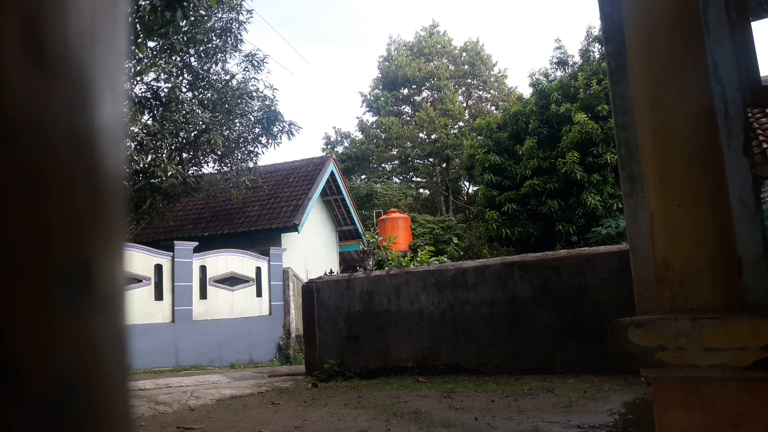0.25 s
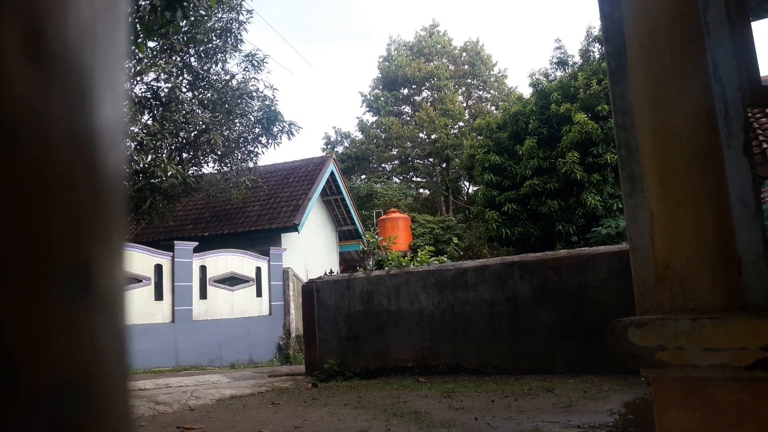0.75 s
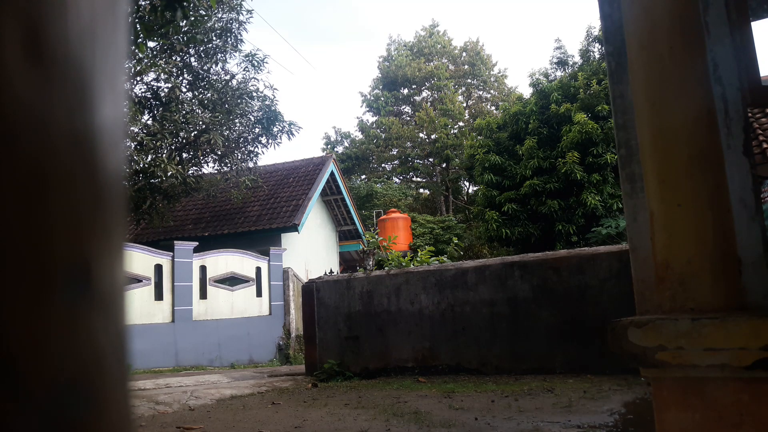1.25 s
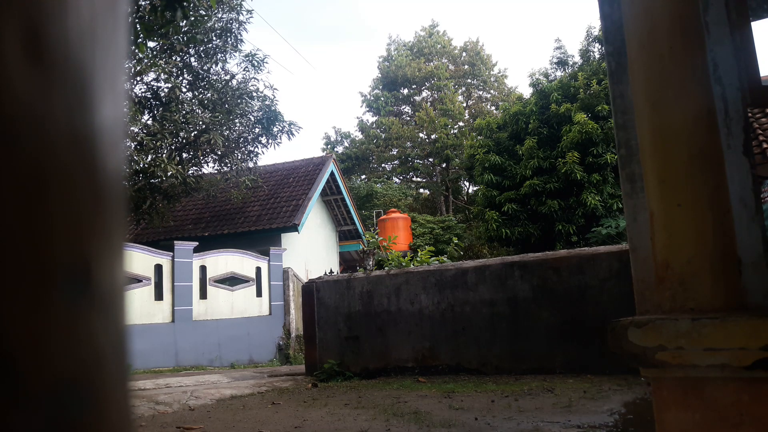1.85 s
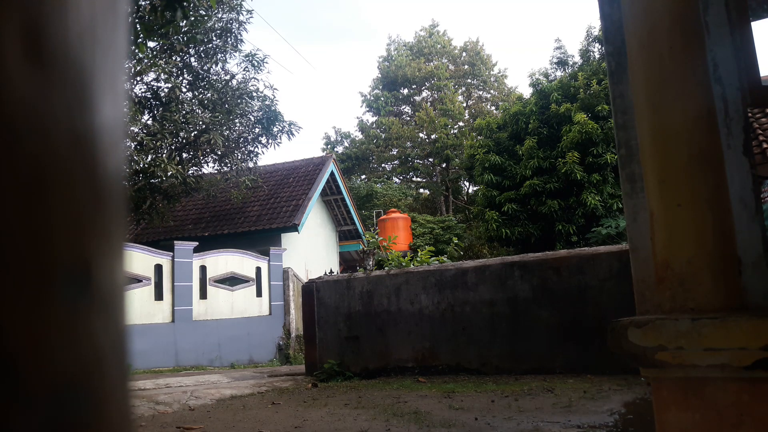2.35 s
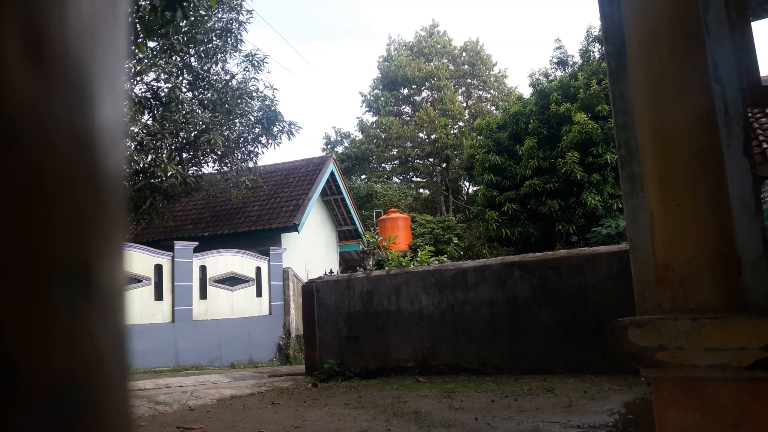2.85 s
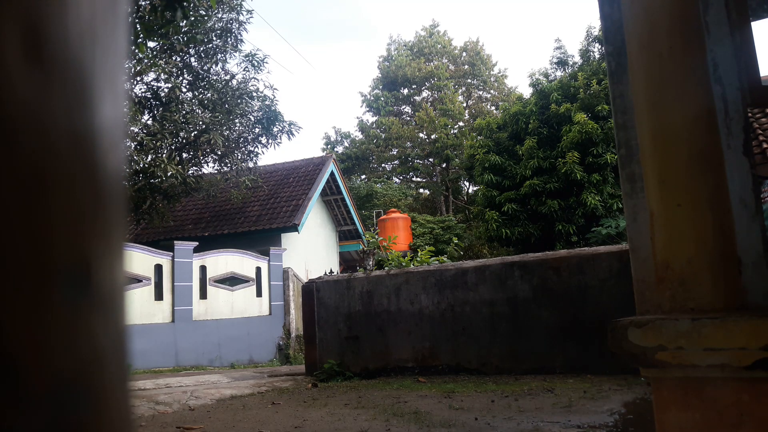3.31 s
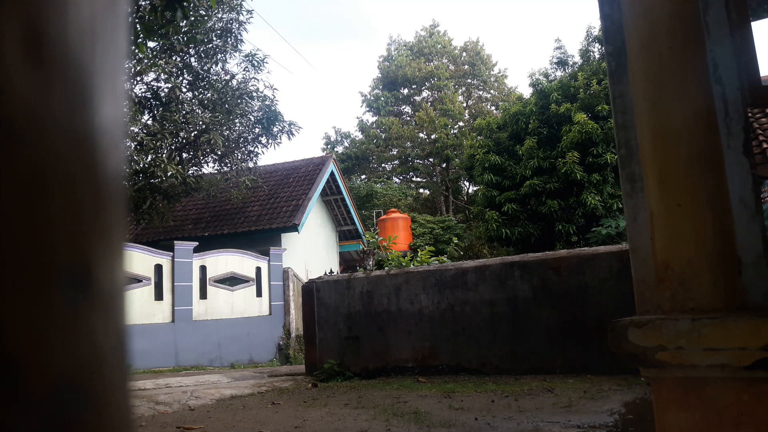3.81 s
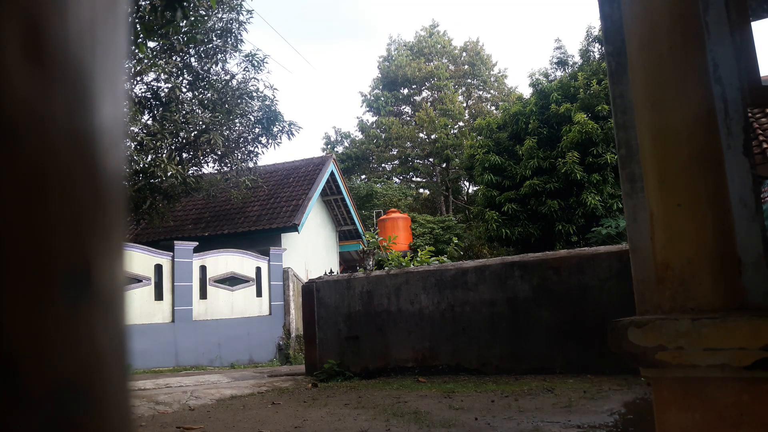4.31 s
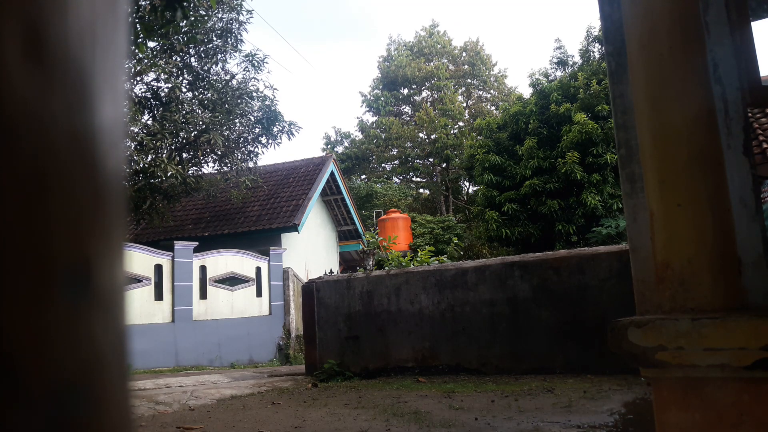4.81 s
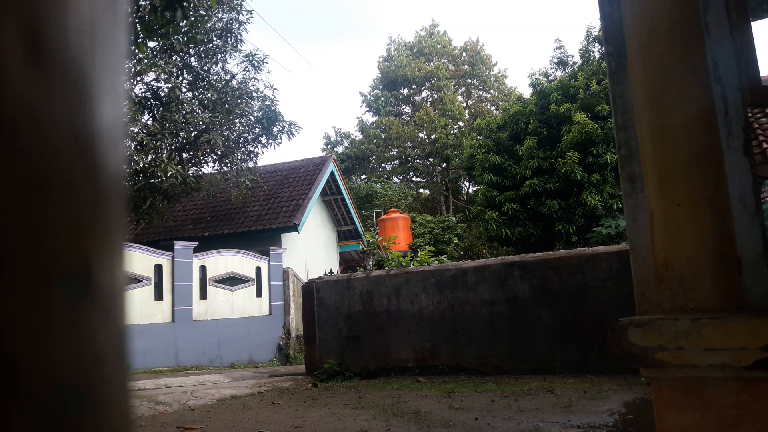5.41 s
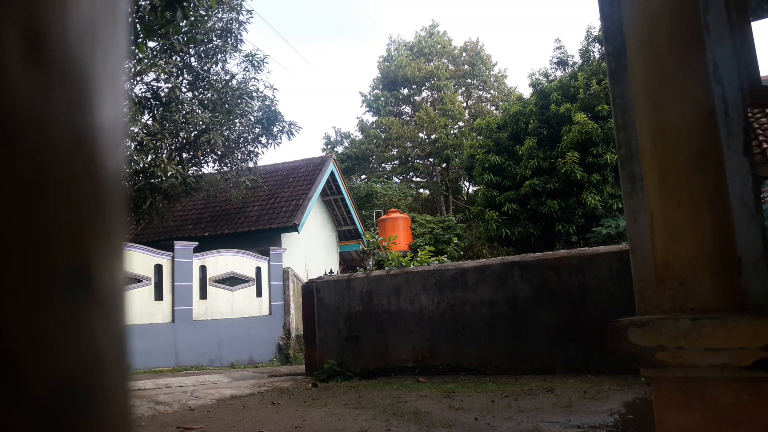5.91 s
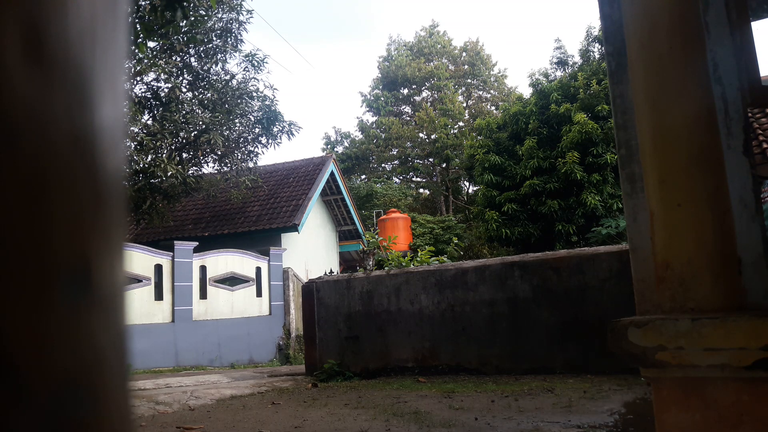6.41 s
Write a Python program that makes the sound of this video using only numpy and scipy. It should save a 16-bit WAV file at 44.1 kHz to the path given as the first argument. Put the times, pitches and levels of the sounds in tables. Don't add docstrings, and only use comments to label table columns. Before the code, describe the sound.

A sudden full-strength thunder clap opens, dips to a rumble, then cracks again and rolls on. After a short lull a crisp double crack lands at two seconds, followed by ever weaker, darker thuds with gaps between. The sound is midrange-heavy and slightly humming under a porch roof, with short echoes between walls. Faint leaf stirring, tiny dry rattles and soft high hiss lie underneath.

```python
import sys
import numpy as np
from scipy import signal
from scipy.fft import rfft, irfft
from scipy.io import wavfile
from scipy.ndimage import uniform_filter1d, minimum_filter1d

SR = 44100
rng = np.random.default_rng(int(sys.argv[2]) if len(sys.argv) > 2 else 0)


def inscribe(sig):
    pcm = np.round(np.clip(np.atleast_2d(sig).T, -1, 1) * 32767)
    wavfile.write(sys.argv[1], SR, pcm.astype(np.int16))


def gain_from_db(level_db):
    decades = np.asarray(level_db, float) / 20
    return 10 ** decades


N = 293573

# t/s, peak
# level/dB, ring f/Hz, front sharpness/dB, front and bright echoes re peak/dB
FRONTS = [(-0.0013, -22, 300, -60, 20), (0.004, 1, 215, -55, -22), (0.727, -4, 240, -28, -9.5),
          (1.003, -10.5, 269, -30, -12), (1.038, -4, 261, -36, -15), (1.101, -17, 331, -27.5, -6),
          (1.95, -3.5, 440, -28, -3.5), (1.985, -10, 382, -44.5, -15), (2.155, -21, 269, -31, 2),
          (2.343, -13, 479, -35, -8), (2.465, -10, 160, -30, -8), (3.074, -17, 310, -34, -4.5),
          (3.159, -11, 190, -27, -7), (3.279, -17, 237, -36, 1.5), (4.141, -17.5, 412, -36.5, -8),
          (4.279, -19, 595, -45, -6), (4.331, -19, 571, -41, -8), (4.44, -18, 328, -35, -11),
          (4.764, -13, 410, -55, -15), (4.941, -22, 253, -39, -6), (5.177, -16.5, 253, -35, -14),
          (5.231, -18, 200, -44, -4), (5.664, -15, 170, -50, -11), (6.6553, -40, 600, -60, 22)]


def evened(x):
    return x / np.sqrt(np.mean(x ** 2) + 1e-20)


def steadied(x, s, share):
    width = round(s * SR)
    power = uniform_filter1d(uniform_filter1d(x ** 2, width), width)
    return evened(x / (power + 1e-9) ** (share / 2))


def colour(x, points):
    hz = abs(np.fft.fftfreq(16384, 1 / SR))
    f, db = np.transpose(points)
    gain_db = np.interp(np.log(hz + 1), np.log(f + 1), db)
    log_gain = np.log(gain_from_db(np.maximum(gain_db, -100)))
    taps = np.fft.ifft(np.exp(np.conj(signal.hilbert(log_gain)))).real
    taps = max(taps, taps[::-1], key=lambda h: np.sum(h[:2000] ** 2))[:8192]
    taps = taps * np.hanning(2 * len(taps))[len(taps):]
    return signal.oaconvolve(x, taps)[:len(x)]


def below(hz, edge_hz, octaves=0.18):
    return 1 / (1 + ((hz + 1) / edge_hz) ** (4 / octaves))


def add(mix, s, sound):
    sound = sound[max(-round(s * SR), 0):]
    part = mix[max(round(s * SR), 0):][:len(sound)]
    part += sound[:len(part)]


def swells(peak_db, start, hold, rise, fall):
    t = np.arange(0, N + 64, 64) / SR
    early = np.maximum(start - t, 0)
    late = np.maximum(t - start - hold, 0)
    db = peak_db - rise * early - fall * late
    return np.interp(np.arange(N) / SR, t, np.sqrt(np.sum(gain_from_db(db) ** 2, axis=0)))


def wind():
    # peak t/s, level/dB, rise/(dB/s), fall/(dB/s)
    gusts = [
        (0.178, -62, 38, 38.5),
        (.66, -61, 34, 62.5),
        (1.051, -71.5, 11, 19),
        (2.499, -67.5, 19, 21.5),
        (3.2, -79, -3, 1.5),
        (5.201, -68.5, 57, 37),
    ]
    s, db, rise, fall = np.transpose(gusts)[:, :, None]
    return swells(db, s, 0, rise, fall)


def high_hiss():
    # f/Hz, level/dB per Hz
    hiss_colour = [(6000, -23), (8000, -12.5), (8800, -9), (11000, -6), (12500, -1.5), (15600, -4),
                   (16000, -31)]
    level_db, duck_db, wind_db = -83, -9.5, -25.5
    back_s, ease_s = 2.04, 0.035
    t = np.arange(N) / SR
    ducked_db = duck_db * (1 - np.tanh((t - back_s) / ease_s)) / 2
    level = np.hypot(gain_from_db(level_db + ducked_db), gain_from_db(wind_db) * wind())
    return level * evened(colour(rng.standard_normal(N), hiss_colour))


def rustle():
    # f/Hz, level/dB per Hz
    leaf_colour = [(1500, -28.5), (2600, 3), (3900, -2), (5000, -6), (6200, -5.5), (7200, -7),
                   (7700, -18.5), (8100, -29.5), (10000, -28), (15700, -32)]
    still_db = -76
    flutter = evened(uniform_filter1d(rng.standard_normal(N), 300))
    scrapes = rng.standard_normal(N) * gain_from_db(1.4 * flutter)
    level = np.hypot(gain_from_db(4.0) * wind(), gain_from_db(still_db))
    return level * evened(colour(scrapes, leaf_colour))


def rattle():
    # f/Hz, width/Hz, level/dB
    modes = [(2580, 82, 0.5), (2900, 48, 2), (3570, 53, 4.5), (3850, 70, 6.5), (4240, 27, 0.5),
             (4950, 40, 0.5), (6610, 42, 0.5)]
    # start t/s, length/s, level/dB, f/Hz
    shakes = [(2.34, .1, -68, 4400), (2.419, .36, -69, 3850), (5.06, .1, -69, 5000), (5.06, .04, -71, 3570),
              (5.155, .07, -60, 6640), (5.161, .05, -56, 2700), (5.185, .05, -65, 3570),
              (5.201, .06, -67, 4300), (5.17, .13, -65.5, 5050), (5.197, .06, -63, 2900),
              (5.242, .1, -72, 6600), (5.332, .03, -57.5, 2900), (5.35, .04, -69, 3720),
              (5.41, .06, -70, 4300), (5.625, .04, -75, 6600)]
    gap_s, spread_db, detune = 0.008, 5, 0.04
    aim_db_per_octave = 26
    out, t = np.zeros(N), np.arange(4000) / SR
    chance = rng.random((len(shakes), 60, 2 + len(modes)))
    for (start, length, db, hz), knocks in zip(shakes, chance):
        for k, (late, size, *turn) in enumerate(knocks[:int(length / gap_s) + 1]):
            ring = np.zeros(len(t))
            for (f, width, mode_db), a in zip(modes, turn):
                aimed_db = mode_db - aim_db_per_octave * abs(np.log2(f / hz))
                pitch = f * (1 + detune * (a - 0.5))
                ring += gain_from_db(aimed_db - 15.6 * width * t) * np.sin(2 * np.pi * (pitch * t + late))
            knock = gain_from_db(db + spread_db * (2 * size - 2)) * ring * np.minimum(t / 0.001, 1)
            add(out, start + (k + late / 2) * gap_s, knock)
    return out


def porch(x):
    # f/Hz, width/Hz, level/dB
    air_modes = [(119, 4.7, -5), (141.8, 11, -7.5), (260.3, 24, -9.5)]
    hum = sum(gain_from_db(db) * signal.lfilter(*signal.iirpeak(hz, hz / width, SR), x)
              for hz, width, db in air_modes)
    return x + hum


def claps():
    ring_s, ring_cycles = 0.046, 15
    crackle_s, front_db = 0.005, 9
    out, t = np.zeros(N), np.arange(SR // 3) / SR
    echoes = rng.standard_normal((len(FRONTS), len(t)))
    front, tick = ((1 - t / w) * np.exp(-t / w) for w in (0.0006, 0.00008))
    front = signal.lfilter(*signal.butter(2, 720, fs=SR), front)
    tick = signal.lfilter(*signal.butter(2, 1300, "highpass", fs=SR), tick)
    air = np.vstack([signal.butter(2, hz, fs=SR, output="sos") for hz in (1500, 2600, 3200)])
    bright = signal.butter(2, [420, 800], "bandpass", fs=SR)
    for (s, db, hz, sharp_db, bright_db), echo in zip(FRONTS, echoes):
        band = signal.butter(2, [hz * 1.1, hz * 1.2], "bandpass", fs=SR)
        fade = gain_from_db(-60 * t / (ring_s + ring_cycles / hz)) * np.minimum(t / 0.0029, 1)
        ring = steadied(signal.lfilter(*band, echo), 0.0065, 0.18) * fade
        snap = steadied(signal.lfilter(*bright, echo), 0.012, 0.53) * fade ** 1.4
        snap = gain_from_db(min(bright_db, 3) - 0.8) * snap
        scatter = signal.oaconvolve(tick, echo * np.exp(-t / crackle_s))[:len(t)]
        crackle = tick + gain_from_db(-7) * scatter
        clap = ring + snap + gain_from_db(bright_db + front_db) * front + gain_from_db(sharp_db + 21) * crackle
        add(out, s, signal.sosfilt(air, gain_from_db(db - 5.5) * clap))
    return out


def lull():
    depth, sink_s, return_s = 0.35, 0.022, 0.0015
    t, gain = np.arange(N) / SR, np.ones(N)
    for s, *_ in FRONTS:
        gain *= 1 - depth * np.exp(-abs(t - s) / np.where(t < s, sink_s, return_s))
    return uniform_filter1d(uniform_filter1d(gain, 60), 60)


def yard(x):
    t60_s, level_db = 0.64, 2.5
    t = np.arange(SR // 2) / SR
    taps = rng.choice([-1., 1.], (6, len(t))) * (rng.random((6, len(t))) < 0.04)
    taps = taps * gain_from_db(-60 * t / t60_s) * (t > 0.004)
    path = (np.arange(N) // 300) % len(taps)
    tails = np.zeros(N)
    for k, tail in enumerate(taps):
        tails += signal.oaconvolve(x * (path == k), tail / np.linalg.norm(tail))[:N]
    return x + gain_from_db(level_db) * tails


def roll():
    # f/Hz, level/dB per Hz
    air_colour = [(15, -69), (30, -41), (52, -24), (65, -15), (95, -4.5), (110, -6), (170, 5), (260, 0),
                  (400, -2), (700, -10.5), (1200, -23.5), (2000, -37.5), (3200, -54), (7500, -99)]
    band_hz = [40, 140, 330, 740, 2800]
    # t/s, hold/s, body level/dB, deep re body/dB, mid re body/dB
    bends = [(-.08, 0.26, -15, -4.5, -5.5), (0.286, 0.11, -23.5, -16.5, -3),
             (0.437, 0.18, -23, -10.5, -3.5), (0.631, .1, -17, -16, -6.5),
             (0.726, 0.15, -14.5, -11.5, -4.5), (1.015, 0.23, -15.5, -6, -6), (1.409, 0.07, -27, -6, -4),
             (1.562, 0.035, -27, -7.5, -0.5), (1.948, 0.084, -17.5, 1.5, -4.5),
             (2.122, 0.26, -28.5, -7, -4), (2.464, .19, -21.5, -7, -5), (2.872, 0.32, -32.5, -11, 0),
             (3.16, 0.011, -23, 1.5, -6.5), (3.277, 0.015, -21.5, -11.5, -5), (3.393, 0.49, -31.5, -7, 0.5),
             (4.126, 0.091, -29.5, -5, 1), (4.293, 0.035, -30.5, -2, 3.5), (4.428, 0.03, -27, 3.5, -6.5),
             (4.748, 0.088, -25, -13, -9), (4.921, .02, -28, -22, -3.5), (5.15, 0.17, -27.5, -8, -6.5),
             (5.655, .09, -25.5, -10, -10), (5.838, .08, -33.5, -7.5, -4.5), (6.544, .14, -40.5, -44, 6)]
    falls = [131, 85.5, 86, 73.4]
    murmur_db = [-35.5, -35, -37.5, -45.5]
    murmur_drift = [-1, -0.5, -.15, -0.8]
    shocks_per_s, spread_db, rise_db_per_s = 2500, 2.5, 418
    edge_db, edge_db_per_s = -8.5, -1.84

    size = gain_from_db(spread_db * np.minimum(rng.exponential(1, N), 5))
    shocks = size * rng.choice([-1., 1.], N) * (rng.random(N) < shocks_per_s / SR)
    spectrum = rfft(colour(yard(shocks), air_colour))
    hz = np.fft.rfftfreq(N, 1 / SR)
    steps = [0 * hz] + [below(hz, f) for f in band_hz[1:-1]] + [1 + 0 * hz]
    bands = [steadied(evened(irfft(spectrum * (upper - lower), N)), 0.13, 1.0)
             for lower, upper in zip(steps, steps[1:])]

    s, hold, db, deep_db, mid_db = np.transpose(bends)[:, :, None]
    mid_peak_db = db + mid_db
    peaks_db = db + deep_db, db, mid_peak_db, mid_peak_db + edge_db + edge_db_per_s * s
    t, out = np.arange(N) / SR, np.zeros(N)
    for band, peak_db, fall, far_db, drift in zip(bands, peaks_db, falls, murmur_db, murmur_drift):
        peals = swells(peak_db, s, hold, rise_db_per_s, fall)
        out += band * np.hypot(peals, gain_from_db(far_db + drift * t))
    return out


def scene():
    thunder = porch(lull() * roll() + claps())
    return (thunder + rustle() + rattle())[None]


def top_cut(x):
    return signal.sosfilt(signal.butter(12, 15730, fs=SR, output="sos"), x)


def record(dry):
    reach = -minimum_filter1d(-abs(dry), 400)
    excess = np.maximum(reach / 0.9, 1)
    held = dry / uniform_filter1d(uniform_filter1d(excess, 200), 200)
    return top_cut(held + high_hiss())


dry = scene()
out = record(dry)
inscribe(out)
```